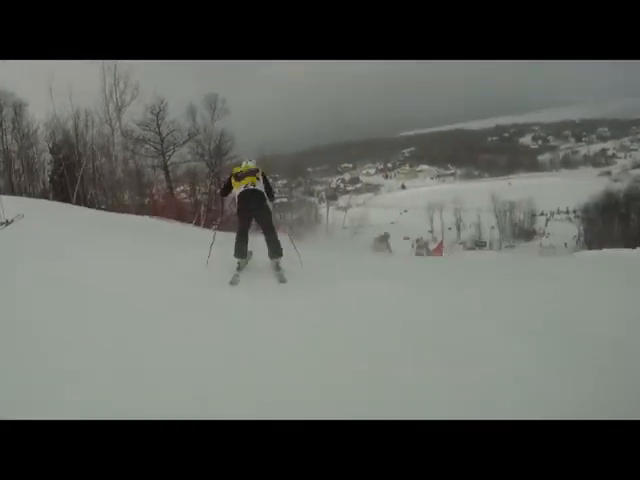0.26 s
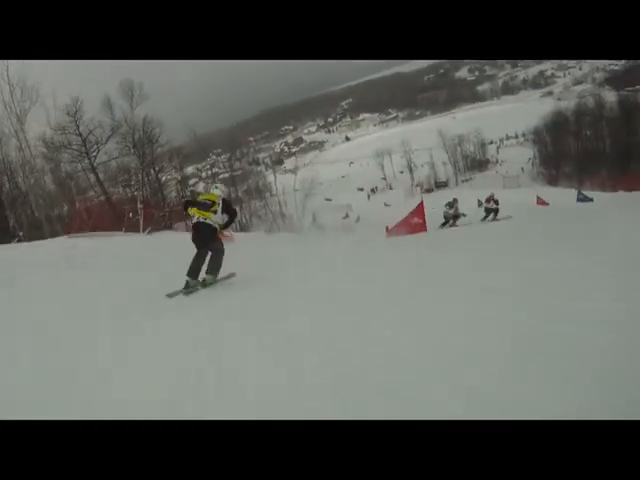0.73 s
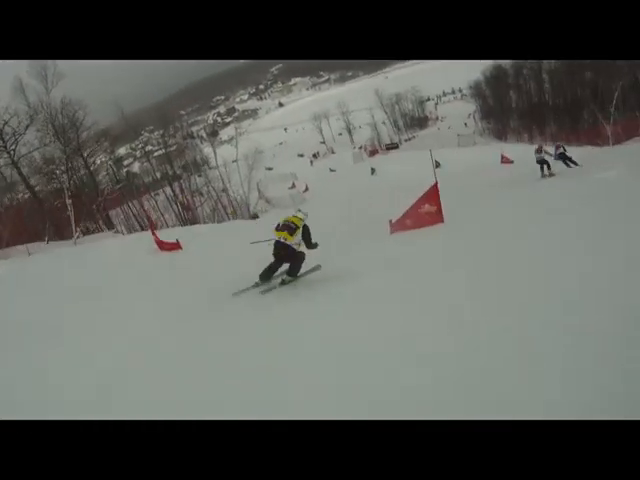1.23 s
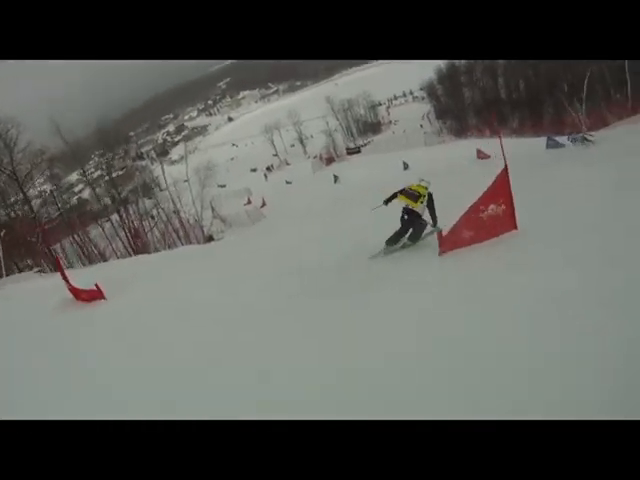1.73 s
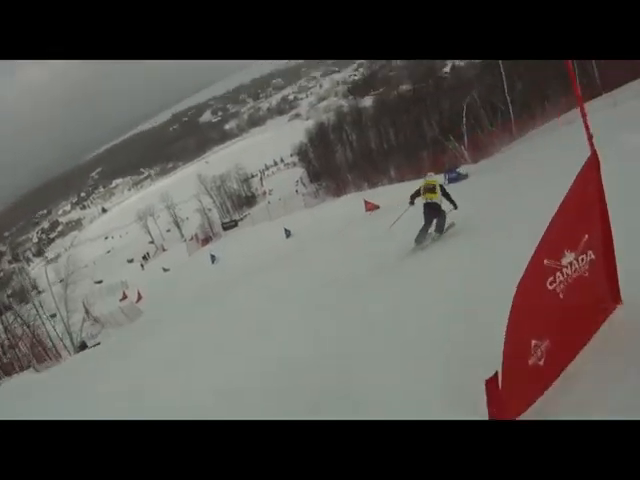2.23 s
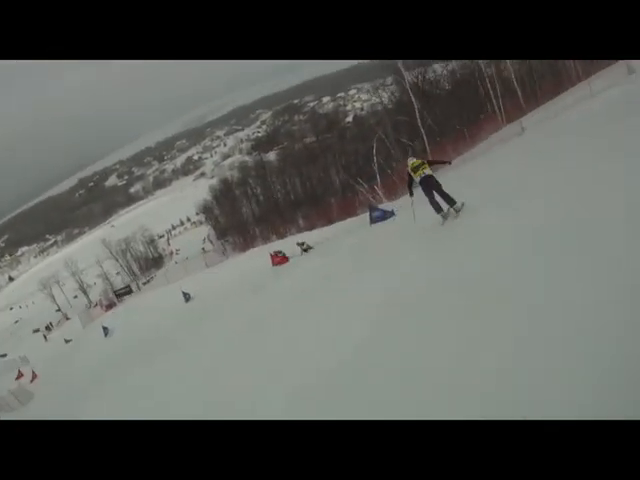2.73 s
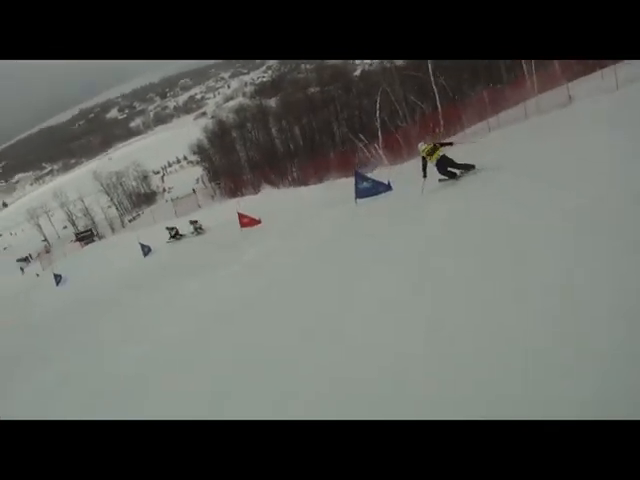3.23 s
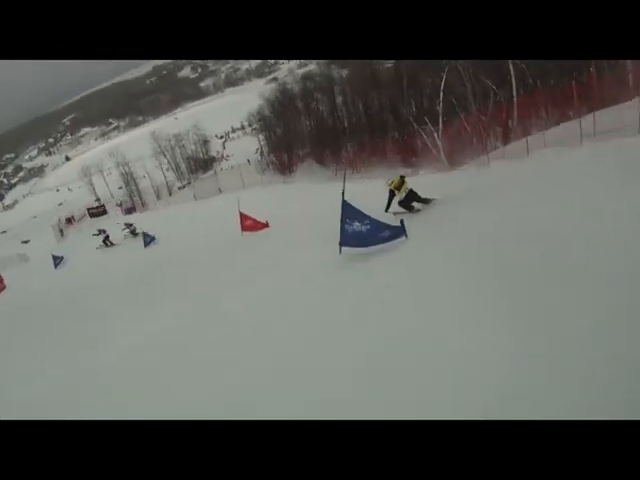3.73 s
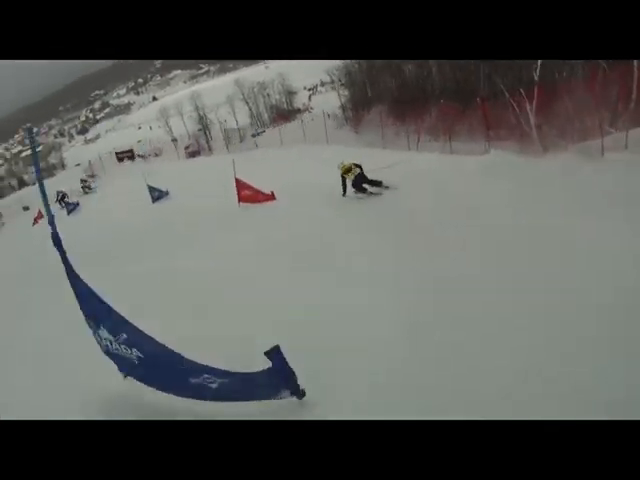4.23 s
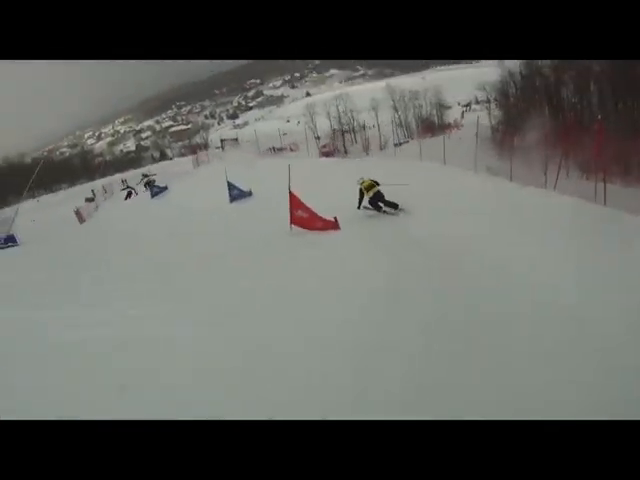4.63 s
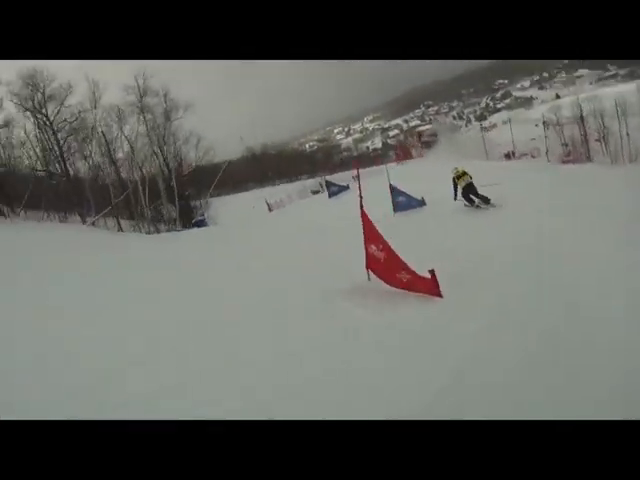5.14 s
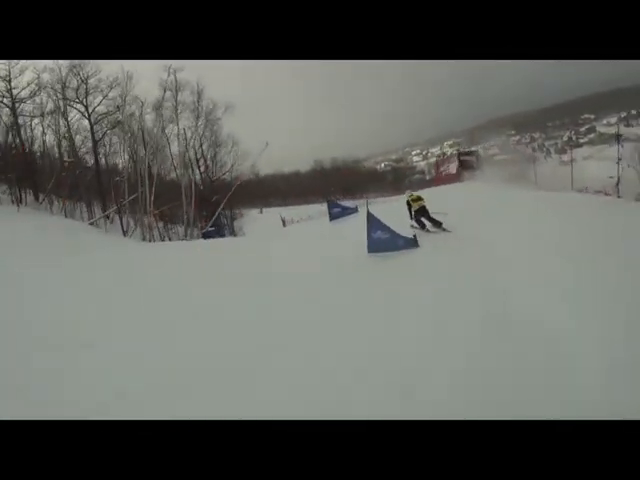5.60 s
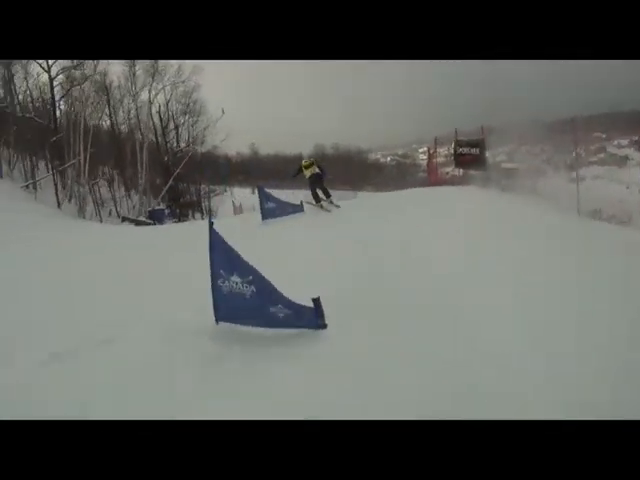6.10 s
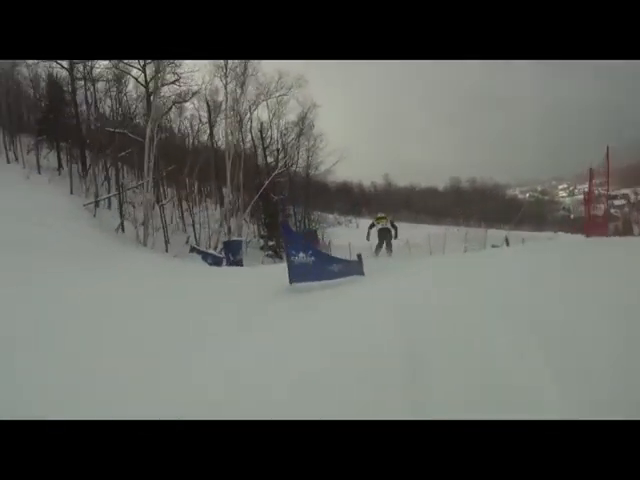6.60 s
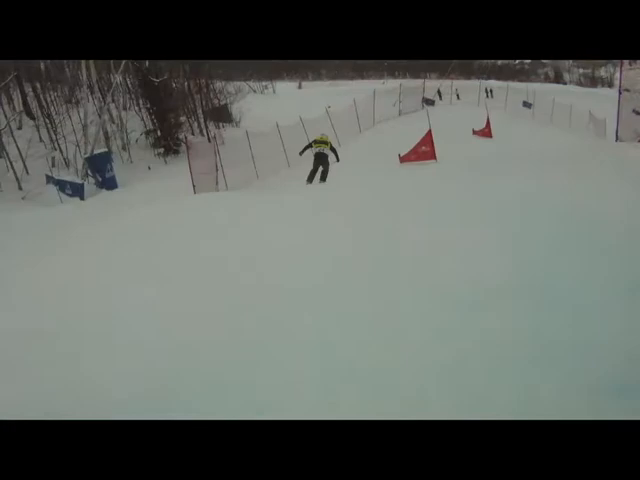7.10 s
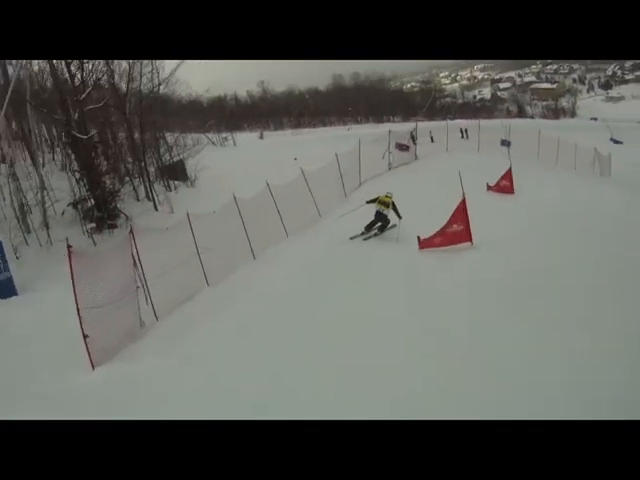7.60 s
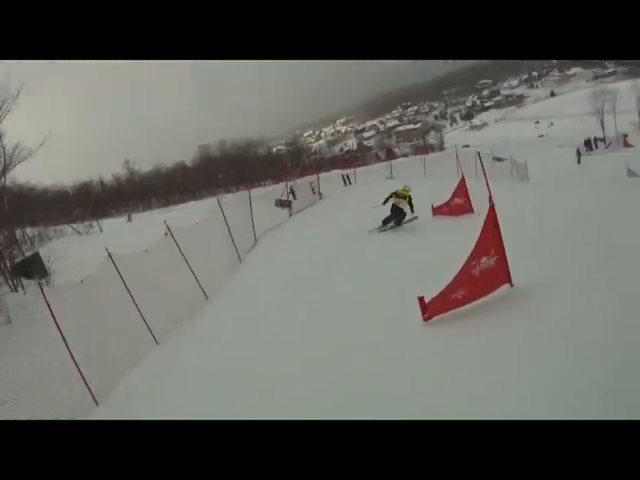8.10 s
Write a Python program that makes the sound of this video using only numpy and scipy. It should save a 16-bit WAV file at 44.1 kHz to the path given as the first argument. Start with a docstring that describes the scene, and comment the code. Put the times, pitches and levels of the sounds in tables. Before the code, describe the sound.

Wind buffets a helmet microphone as skis hiss and scrape down packed snow, with low bumps and two pole knocks.

```python
"""A packed ski course, heard from a small camera in a sealed plastic case on the skier's helmet.
Right at the microphone, wind drums and whistles on the case and bumps jolt the humming mount.
A body's length below, the skis glide, carve and spray snow; a pole knocks twice.
The sound is stored at a low rate and played back in held steps, which mirrors it into the treble."""
import sys
import numpy as np
from scipy import signal
from scipy.fft import rfft, irfft
from scipy.io import wavfile

SR = 44100
rng = np.random.default_rng(int(sys.argv[2]) if len(sys.argv) > 2 else 0)


def wav_out(sig):
    """Save sig, one row per channel (or a flat mono array), as 16-bit PCM at SR to the path in sys.argv[1]."""
    wavfile.write(sys.argv[1], SR, np.round(np.clip(np.atleast_2d(sig).T, -1, 1) * 32767).astype(np.int16))


N = 368235


def from_db(db):
    """Decibels to gain."""
    return 10 ** (np.asarray(db) / 20)


def rms_one(x):
    """Scale to unit rms."""
    return x / np.sqrt(np.mean(x ** 2) + 1e-20)


def curves(rows):
    """One curve per column after the time column, interpolated at every sample."""
    times, *columns = np.transpose(rows)
    return [np.interp(np.arange(N) / SR, times, column) for column in columns]


def swells_db(rows):
    """Smooth swells or dips, each (centre [s], length [s], height [dB])."""
    t = np.arange(N) / SR
    return sum(db * np.cos(np.pi * np.clip((t - s) / length, -.5, .5)) ** 2 for s, length, db in rows)


def drift(hz):
    """Random wander: noise low-passed twice at hz; rms 1."""
    r = np.exp(-2 * np.pi * hz / SR)
    return rms_one(signal.lfilter([1], [1, -2 * r, r * r], rng.standard_normal(N + SR))[SR:])


def grit(per_s, spread_db):
    """Dense random impacts of uneven size."""
    sizes = from_db(spread_db * np.minimum(rng.exponential(1, N), 5)) * rng.choice([-1, 1], N)
    return sizes * (rng.random(N) < per_s / SR) + 1e-18


def resonate(x, modes):
    """Parallel resonances, each applied twice for dark valleys; rms 1."""
    out = 0
    for k, (hz, width_hz, db) in enumerate(modes):
        r = np.exp(-np.pi * 1.5 * width_hz / SR)
        b = (1 - r * r) / 2 * np.array([1, 0, -1])
        a = [1, -2 * r * np.cos(2 * np.pi * hz / SR), r * r]
        out = out + from_db(db) * signal.lfilter(b, a, signal.lfilter(b, a, x)) * (-1) ** k
    return rms_one(out)


def ring(times, levels_db, hz, t60):
    """Each event sets one decaying sine ringing."""
    clicks = np.full(N, 1e-18)
    clicks[np.round(times * SR).astype(int)] = from_db(levels_db)
    r, w = from_db(-60 / (t60 * SR)), 2 * np.pi * hz / SR
    return signal.lfilter([0, np.sin(w)], [1, -2 * r * np.cos(w), r * r], clicks)


def case_wind(chatter_db):
    """Wind drums on the case, right at the microphone."""
    # low case resonances: (frequency [Hz], width [Hz], gain [dB])
    modes = [(1207, 108, -2), (1510, 194, -13.5), (838.4, 48, -19), (605, 21, -24.5)]
    return resonate(grit(per_s=9000, spread_db=2) * from_db(.07 * chatter_db + 1.05 * drift(21)), modes)


def edge_carve(chatter_db):
    """Chattering edges scrape packed snow, coarse grains ringing the case."""
    # middle case resonances: (frequency [Hz], width [Hz], gain [dB])
    modes = [(1635, 252, 6.5), (2080, 290, -3.5), (2286, 150, 6), (2690, 75, -7)]
    return resonate(grit(per_s=8000, spread_db=3.2) * from_db(1.54 * chatter_db + .9 * drift(57)), modes)


def base_glide(chatter_db):
    """The ski bases slide with a finer, steadier hiss."""
    # mostly broad case resonances: (frequency [Hz], width [Hz], gain [dB])
    modes = [(1403, 410, -1.5), (2128, 324, -4), (2673, 324, -1), (2917, 56, 0.5), (3254, 630, -1),
             (4520, 290, -14.5)]
    return resonate(grit(per_s=9500, spread_db=1.7) * from_db(.3 * chatter_db + .75 * drift(38)), modes)


def bumps():
    """Soft jolts thud in the mount and rattle it."""
    # bumps on the course: (time [s], thud level [dB], rattle relative to thud [dB])
    jolts = [(1.727, -16, -10), (1.868, -25.5, -11), (3.984, -24, -27), (4.246, -23, -1), (4.313, -28, -10),
             (4.772, -19.5, -8), (4.86, -20, -26), (4.981, -22, -7.5), (5.202, -17, -18), (5.914, -25, -24),
             (6.049, -24.5, -11), (6.253, -28, -12), (6.724, -18, -19), (7.119, -29, -15)]
    # the mount's thud: (frequency [Hz], t60 [s])
    thud_mode = (97.7, 0.192)
    # its rattle: (frequency [Hz], gain [dB], t60 [s])
    rattle_modes = [(175, -1.5, 0.029), (284, -1.8, 0.039), (636, 0.75, 0.07)]
    times, thud_db, rattle_db = np.transpose(jolts)
    rattle = sum(ring(times, thud_db + rattle_db + db, hz, t60) for hz, db, t60 in rattle_modes)
    return ring(times, thud_db, *thud_mode) + rattle


def pole_knocks():
    """Hard pole blows: neighbouring modes start in opposite sense and beat; the high panel follows."""
    # pole blows: (time [s], level [dB])
    blows = [(1.7233, 10), (4.2462, 6.5)]
    # what a blow rings: (frequency [Hz], gain [dB], t60 [s], delay [s])
    modes = [(2130, -4, .014, 0), (2460, -4, .012, 0), (3520, -9, .010, .0024), (4900, -20, .006, 0),
             (1150, -28, .016, 0)]
    times, blow_db = np.transpose(blows)
    return sum((-1) ** k * ring(times + delay, blow_db + db, hz, t60)
               for k, (hz, db, t60, delay) in enumerate(modes))


def edge_bites():
    """An edge bites: a short swell of noise through one resonance."""
    # ringing bites: (start [s], length [s], frequency [Hz], width [Hz], level [dB])
    bites = [(0.358, 0.036, 1200, 150, -33.5), (0.411, 0.041, 1220, 200, -34),
             (0.498, 0.043, 1170, 150, -38.5), (0.567, 0.056, 2230, 120, -34.5),
             (3.364, 0.049, 2240, 200, -25.5), (3.384, 0.11, 2600, 150, -32), (4.04, 0.046, 1700, 200, -15),
             (4.319, .1, 1670, 150, -29), (4.218, 0.009, 1710, 302, -13), (4.24, 0.00463, 1390, 410, -8),
             (7.102, 0.016, 3760, 900, -27), (7.378, 0.073, 2570, 250, -27),
             (7.422, 0.042, 1360, 700, -22.5), (7.415, 0.032, 3750, 300, -29)]
    out = np.zeros(N)
    for start, length, hz, width_hz, db in bites:
        first, size = round(start * SR), round(length * SR)
        scrape = resonate(rng.standard_normal(SR // 4), [(hz, width_hz, 0)])[-size:]
        out[first:first + size] += from_db(db) * rms_one(scrape) * np.hanning(size)
    return out


def case_whistle(chatter_db):
    """The case whistles roughly, fluttering as the skis chatter."""
    # narrow case resonances: (frequency [Hz], width [Hz], gain [dB])
    modes = [(3560, 260, -1.5), (3730, 23, -9), (4440, 140, -12.5), (1472, 200, -5), (2405, 130, -6),
             (2010, 83, -7)]
    return resonate(grit(per_s=9000, spread_db=1.3) * from_db(1.2 * chatter_db + 1.15 * drift(34)), modes)


def snow_spray(chatter_db, clump_s=.017):
    """Thrown snow hisses in the treble, flaring with each clump."""
    # high case resonances: (frequency [Hz], width [Hz], gain [dB])
    modes = [(3740, 270, 9), (4700, 680, 7), (5190, 990, 7), (3380, 590, -38.5)]
    # clumps of snow: (time [s], swell [dB])
    clumps = [(.31, 2), (.396, 8), (.472, 10), (.68, 11), (.714, 9), (.94, 5), (1.012, 5), (1.145, 11),
              (1.39, 7), (1.94, 4), (2.07, 13), (2.23, 7), (2.37, 8), (2.56, 9), (2.65, 9), (2.69, 11.5),
              (3.68, 1), (4.85, 5), (4.91, 0), (5.51, 0), (6.19, 4), (6.7, 11), (8.2, -2)]
    grains = grit(per_s=9000, spread_db=3) * from_db(.8 * chatter_db + 1.1 * drift(35))
    return resonate(grains, modes) * from_db(swells_db([(s, clump_s, db) for s, db in clumps]))


def gusts(band_hz=(5, 70)):
    """Slow heaves of air pressure at the microphone port."""
    # gust strength: (time [s], level [dB])
    strength = [(0.0, -52), (1.53, -53), (1.6, -41), (1.7, -37), (1.88, -29.5), (1.97, -38.5), (2.39, -42),
                (2.49, -32), (2.7, -45), (2.79, -30.5), (3.12, -45.5), (3.77, -50), (4.09, -25.5),
                (4.47, -29), (4.51, -39.5), (5.07, -26), (5.16, -43), (5.21, -30), (5.39, -52), (5.53, -39),
                (7.49, -45), (7.51, -61), (7.61, -53), (8.35, -43)]
    pressure = rng.standard_normal(N) * from_db(drift(10))
    band = signal.butter(1, band_hz, "band", fs=SR, output="sos").repeat(3, axis=0)
    return from_db(curves(strength)[0]) * rms_one(signal.sosfilt(band, pressure))


def mount_hum():
    """The mount hums at its two low resonances."""
    # mount resonances: (frequency [Hz], width [Hz], gain [dB])
    modes = [(91.8, 26, -7), (68, 34, -20.5)]
    # hum strength: (time [s], level [dB])
    strength = [(0.0, -55), (0.44, -47.5), (1.63, -51), (1.95, -47.5), (2.14, -48), (2.81, -45.5),
                (3.74, -42.5), (4.16, -43), (4.58, -40), (5.02, -44), (5.35, -37), (6.4, -40), (6.58, -39),
                (7.28, -43.5), (7.65, -40), (8.35, -38.5)]
    shaking = rng.standard_normal(N) * from_db(.57 * drift(11))
    return from_db(curves(strength)[0]) * resonate(shaking, modes)


def air_rush():
    """Air rushes past the microphone port in a broad, fluttering noise."""
    # spectrum of the rush: (frequency [Hz], relative density [dB])
    spectrum = [(88, -30), (150, -4), (270, -7.5), (324, -7), (414, -8), (564, -7.5), (613, -6),
                (695, -9.5), (800, -9.5), (1040, -9.5), (1760, -120)]
    # rush strength: (time [s], level [dB])
    strength = [(0.0, -58.5), (0.56, -53), (1.23, -53), (2.09, -44), (2.74, -44.5), (3.56, -49.5),
                (3.95, -47.5), (4.14, -40.5), (4.58, -42.5), (5.37, -48.5), (5.88, -41), (6.19, -42.5),
                (6.93, -48), (8.35, -41.5)]
    hz, db = np.transpose(spectrum)
    bin_hz = np.maximum(np.arange(N // 2 + 1) * SR / N, 1)
    colour = from_db(np.interp(np.log(bin_hz), np.log(hz), db))
    flutter = rng.standard_normal(N) * from_db(2.1 * drift(28))
    return from_db(curves(strength)[0]) * rms_one(irfft(rfft(flutter) * colour, N))


def scene():
    """At the helmet: five rough layers share the run's force, ruts and chatter; the rest add on top."""
    # force of skis and air on the case: (time [s], level [dB])
    run = [(0, -49), (.2, -43.5), (.42, -35.5), (.72, -41), (.95, -38), (1.4, -36), (1.74, -28),
           (1.84, -23.5), (2.15, -26.5), (2.6, -23.5), (3.35, -29), (3.5, -30.5), (3.9, -25), (3.97, -20.5),
           (4.15, -19), (4.8, -19.5), (5.0, -23), (5.3, -25), (5.75, -20.5), (6.4, -23), (6.75, -24),
           (7.05, -28.5), (7.32, -31), (7.5, -25.5), (7.7, -22.5), (8.0, -23), (8.1, -21), (8.35, -21)]
    # the skis skip or dig in over ruts: (centre [s], length [s], change [dB])
    ruts = [(.39, 0.1, 1), (0.53, 0.082, 3), (0.763, 0.094, -3), (1.06, .05, 2.5), (1.21, 0.046, 3.5),
            (1.79, .05, 2.5), (1.82, .03, -3), (2.1, 0.022, 3.5), (2.24, 0.032, 2), (2.9, 0.089, -2.5),
            (4.067, 0.028, -1), (4.092, 0.028, -6), (4.12, .05, 3), (4.25, 0.029, 0), (4.275, 0.034, 4),
            (4.33, .05, 2.5), (4.58, 0.037, 0.5), (4.881, 0.023, -4.5), (5.21, 0.03, 3),
            (5.71, 0.056, -2.5), (5.795, .06, 2.5), (5.89, 0.048, -4.5), (6.141, 0.081, -5),
            (6.544, 0.14, -3.5), (7.08, 0.067, -4), (7.124, 0.032, 5.5), (7.416, 0.19, 4.5),
            (7.48, 0.044, -2), (7.61, .05, 1), (8.29, .04, -0.5)]
    # shares of that force: (time [s], wind [dB], carve [dB], glide [dB], whistle [dB], spray [dB])
    shares = [(0, -3.5, 1, -2, -9, -15), (.45, -2.5, -5, -7.5, -16, -16), (.7, -3.5, -4.5, -5, -10, -16),
              (.76, -4, -4, -10, -15, -22), (.88, -4.5, -7, -7, -7, -20), (1.0, -9.5, -16, -10.5, -3, -14),
              (1.4, -9, -12, -4.5, 0, -10.5), (1.6, -9.5, -3, -7.5, -6, -17), (1.95, -6, 0, -7.5, -20, -14),
              (2.3, -7, -2.5, -10, -15, -20), (2.7, -5.5, -4, -7, -22, -20.5),
              (3.5, -2.5, -5, -1.5, -10, -14), (3.9, -6, -4, -5.5, -16, -15.5),
              (4.15, -6.5, -1.5, -4, -12, -11), (4.8, -4, -3, -6.5, -14, -15),
              (5.0, -2.5, -0.5, -2.5, -11, -13), (5.1, -3.5, -8, -1, -11, -13.5),
              (5.4, -4, -7.5, -1.5, -6.5, -15), (5.9, -3.5, -6.5, -2, -13, -17),
              (6.4, -1.5, -4.5, -3.5, -12.5, -14.5), (7.2, -4, -6.5, -5, -14, -19),
              (7.6, -5, -9.5, -4, -13, -18), (8.0, -4.5, -9, -4, -17, -16.5),
              (8.35, -2, -9, -3.5, -19, -21)]
    force_db = curves(run)[0] + swells_db(ruts) + .4 * drift(13)
    chatter_db = .53 * drift(11) + drift(87)
    layers = case_wind, edge_carve, base_glide, case_whistle, snow_spray
    case = sum(from_db(force_db + share_db) * layer(chatter_db)
               for layer, share_db in zip(layers, curves(shares)))
    background = mount_hum() + gusts() + air_rush()
    return (case + bumps() + pole_knocks() + edge_bites() + background)[None]


def limiter(x, threshold_db=-3, release_db_s=90, attack_hz=50):
    """Gain drops a few ms after a loud peak and climbs back steadily."""
    ramp = release_db_s * np.arange(N) / SR
    over_db = np.maximum(20 * np.log10(np.abs(x) + 1e-9) - threshold_db, 0)
    held_db = np.maximum.accumulate(over_db + ramp, axis=1) - ramp
    r = np.exp(-2 * np.pi * attack_hz / SR)
    return x * from_db(-signal.lfilter([1 - r], [1, -r], held_db))


def record(dry, stored_hz=12000, hold=4, cutoff_hz=15250):
    """The camera limits, stores at a low rate and clips; playback holds each sample and cuts the top."""
    band = signal.sosfilt(signal.butter(4, 5600, fs=SR, output="sos"), limiter(dry))
    stored = np.clip(signal.resample_poly(band, stored_hz, SR, axis=1), -.97, .97)
    steps = signal.resample_poly(np.repeat(stored, hold, axis=1), SR, stored_hz * hold, axis=1)[:, :N]
    return signal.sosfilt(signal.ellip(12, .5, 80, cutoff_hz, fs=SR, output="sos"), steps)


dry = scene()
out = record(dry)
wav_out(out)
```